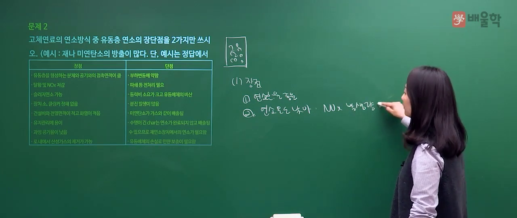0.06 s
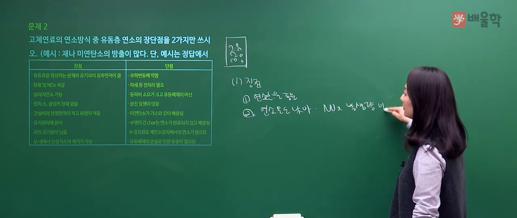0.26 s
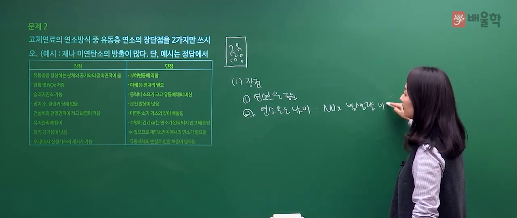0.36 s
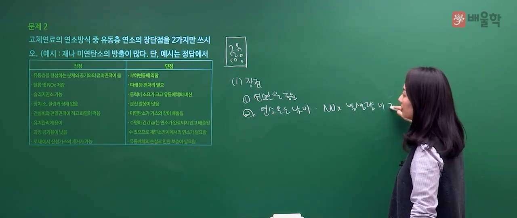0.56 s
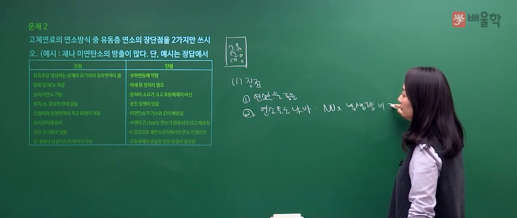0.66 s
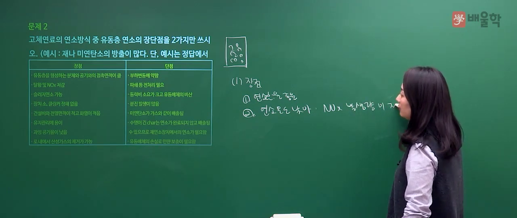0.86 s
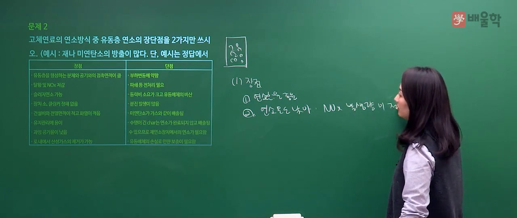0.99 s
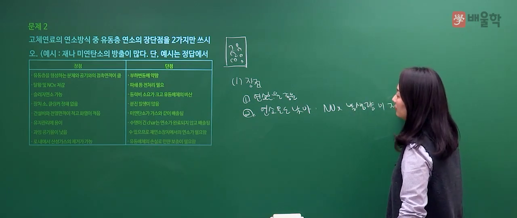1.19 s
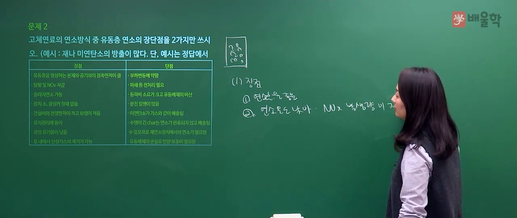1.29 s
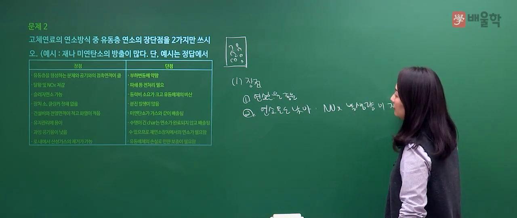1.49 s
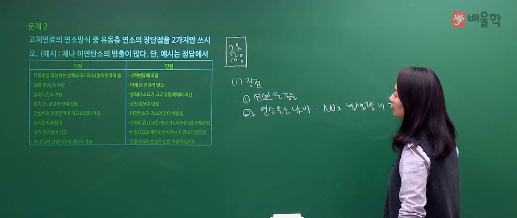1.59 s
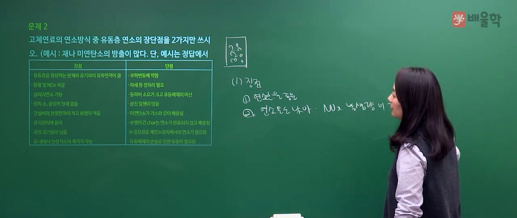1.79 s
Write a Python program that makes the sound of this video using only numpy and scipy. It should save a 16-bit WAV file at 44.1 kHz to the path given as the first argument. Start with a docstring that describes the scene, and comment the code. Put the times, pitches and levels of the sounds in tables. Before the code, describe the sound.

A stick of chalk taps a big wall board five times, the first two strongest, each followed by a slight dry rub; the board resonates briefly in a quiet room, picked up by one microphone with low room noise.

```python
"""Chalk on a wall board

Chalk writes on a large wall board in a quiet classroom. Dry knocks are a short push filtered by the
board's response, with a low thump and a crack at the tip; echoes, bending waves returning from
the frame, panel modes and room reverberation prolong them. The sliding chalk is random grains
filtered into a faint hiss, a rub and a panel hum, with tiny clicks where the tip catches.
Shaped noise forms the low room background."""
import sys
import numpy as np
from scipy import signal
from scipy.fft import rfft, irfft
from scipy.io import wavfile

SR = 44100
rng = np.random.default_rng(int(sys.argv[2]) if len(sys.argv) > 2 else 0)


def materialize(psi):
    """Save the field psi as 16-bit PCM at rate SR to the path in sys.argv[1].

    A 1-D psi becomes a single channel; in a 2-D psi each row is a channel.
    """
    bounded = np.clip(np.atleast_2d(psi).T, -1, 1)
    quanta = np.round(bounded * 32767).astype(np.int16)
    wavfile.write(sys.argv[1], SR, quanta)


N = 81585  # output length in samples
SIZE = 2 ** 17  # transform length in samples
HZ = np.maximum(np.arange(SIZE // 2 + 1) * SR / SIZE, 1)
AGE = np.arange(SIZE) / SR  # seconds

# Landings of the chalk. Each row: time in seconds, push level in dB, contact corner in Hz,
# tip crack in dB re CRACK_DB, thump in dB re THUMP_DB, stick ring in Hz, stick ring level in dB.
TAPS = [(0.2199, -0.5, 1760, 5, -0.5, 3900, -60), (0.4604, -1.5, 1186, -1.5, 2.5, 3220, -44.5),
        (0.7624, -6, 2930, 1.5, -3, 3840, -64), (1.2945, -5, 950, -28, -4.5, 3740, -52),
        (1.57, -5, 2580, -4.5, -2.5, 5300, -38.5)]
CONTACT_TOP = 2.17  # the push falls off faster above this multiple of the contact corner
STICK_T60_S = .009

# Response of the board at the point of contact. Each row: frequency in Hz, gain in dB re BOARD_DB.
BOARD = [(40, -20), (200, 2), (320, 10), (620, 13), (800, 10.5), (920, 0.5), (1100, 10), (1450, 8.5),
         (1850, 8.5), (2300, 3.5), (3050, 0), (3350, -12.5), (3900, 0.5), (5200, -2.5), (6300, -6.5),
         (16000, -54)]
BOARD_DB = 0.5

# Early reflections off nearby surfaces. Each row: delay in ms, signed share of the echo level.
ECHOES = [(3.98, -.11), (4.46, -.24), (6.14, .15)]
ECHO_CORNER_HZ, ECHO_LEVEL_DB = 2800, 1

# Bending waves back from the frame. Each row: travel time in ms at BEND_HZ, signed share.
RETURNS = [(8.18, -.1), (8.98, .3), (12.54, -.1), (14.54, -.15), (15.98, .14), (18.34, .1), (23.28, -.13),
           (26.88, -.13), (28.8, .12), (31.04, .13), (33.32, .13), (36.84, .15), (39.12, .19),
           (49.28, -.09), (57.68, .09)]
BEND_HZ, BEND_CUT_HZ, BEND_LOW_HZ, BEND_DB = 500, 1550, 313, -0.5

# Dense reflections: early scatter, the wash of many merged later returns, and the room.
SCATTER_DB, SCATTER_T60_S, SCATTER_DELAY_S = -7, 0.017, 0.003265
SCATTER_HZ, SCATTER_WIDTH_OCT = 1770, 0.31
WASH_DB, WASH_T60_S, WASH_DELAY_S, WASH_HZ, WASH_WIDTH_OCT = -20.5, 0.19, .02, 880, 0.71
ROOM_DB, ROOM_T60_S, ROOM_DELAY_S, ROOM_CUT_HZ = -17, 0.34, .012, 12000

# Modes of the panel. Each row: frequency in Hz, mean level in dB before the rise, T60 in seconds.
PANEL = [(201.7, -53, 0.53), (320, -62, 0.54), (360.3, -39, 0.19), (412, -49, 0.12), (456, -54.5, 0.3),
         (515, -54, 0.36), (667, -51, 0.27), (777, -52, 0.45), (768, -53, 0.1), (890, -52, .16),
         (1020, -76, 0.085), (1190, -70, 0.15)]
PANEL_RISE_S, PANEL_SPREAD_DB = 0.054, 3  # the balance changes with the spot that is struck

THUMP_HZ, THUMP_T60_S, THUMP_DB, THUMP_RISE_S = 60, 0.066, -33, 0.006

# Spectrum of the crumbling tip. Each row: frequency in Hz, relative level in dB.
CRACK = [(2500, -19), (4200, -1.5), (6200, -6), (8000, -0.5), (9600, -7), (11000, 3), (13000, -11),
         (16000, -2.5)]
CRACK_DB, CRACK_T60_S = -38.5, 0.0079

# Slides of the chalk. Each row: start in seconds, length in seconds, hiss in dB, rubbing in dB,
# panel hum in dB.
STROKES = [(-.02, 0.08, -70, -59.5, -68), (0.21, 0.11, -66, -59.5, -62.5), (0.475, 0.1, -67, -63.5, -61),
           (0.559, 0.095, -72, -60.5, -58.5), (0.76, 0.072, -67.5, -67, -57.5),
           (0.866, 0.077, -67.5, -58, -69), (0.935, 0.12, -71, -60.5, -62),
           (1.042, 0.12, -67, -61.5, -64.5), (1.167, 0.028, -78, -59, -83), (1.276, 0.029, -82, -57, -70),
           (1.297, 0.16, -72, -62, -65.5), (1.571, 0.1, -66, -60, -79), (1.703, 0.23, -72, -65, -74)]
STROKE_ATTACK_S, STROKE_RELEASE_S = 0.032, 0.033
STROKE_HUM_HZ, STROKE_HUM_OCT = 323, .05
GRAINS_PER_S, GRAIN_SPREAD_DB = 5600, 2.5

# Spectrum of the hiss at the tip. Each row: frequency in Hz, relative level in dB.
HISS = [(2500, -31), (4000, 1), (6200, -14.5), (8000, 3), (9400, 7.5), (10500, -2), (12000, 7),
        (16000, -4.5)]
# Spectrum of the rub on the board's face. Each row: frequency in Hz, relative level in dB.
RUB = [(40, 12), (250, 6), (450, -17), (900, -3.5), (1400, -4.5), (2100, -4.5), (3000, -9.5), (6000, -13.5)]

# Light catches of the tip. Each row: time in seconds, level in dB before the decay.
TICKS = [(1.117, -54.5), (1.696, -61)]
TICK_HZ, TICK_WIDTH_OCT, TICK_T60_S = 3300, .2, .02

# Spectrum of the room noise. Each row: frequency in Hz, relative density in dB per Hz.
AIR = [(15, -41), (25, -4.5), (190, -9), (256, -9.5), (335, -7), (394, -6.5), (503, -6), (677, -13),
       (988, -14.5), (1070, -18), (1400, -13), (1650, -21), (2220, -21), (2840, -28), (3430, -27),
       (3720, -29.5), (16000, -30.5)]
AIR_DB = -59.5
# Narrow bands in the room noise. Each row: centre frequency in Hz, level in dB.
HUM = [(322, -78), (443, -75)]
HUM_WIDTH_OCT = 0.026

CUTOFF_HZ = 16000


def taps():
    """Impact excitation: each push drives one board and its modes; thump, crack and stick ring add."""
    board = from_db(BOARD_DB) * colour(BOARD) * paths()
    low_thump = thump()
    tip = colour(CRACK)
    spectrum = 0
    for s, db, contact_hz, crack_db, thump_db, stick_hz, stick_db in TAPS:
        push = from_db(db) * low_pass(contact_hz) * abs(low_pass(CONTACT_TOP * contact_hz))
        knock = push * (board + panel(PANEL_SPREAD_DB))
        knock = knock + from_db(THUMP_DB + thump_db) * low_thump
        crack = from_db(CRACK_DB + crack_db) * noise(tip) * dying(CRACK_T60_S)
        stick = from_db(stick_db) * np.sin(2 * np.pi * stick_hz * AGE) * dying(STICK_T60_S)
        spectrum = spectrum + delay(s) * (knock + rfft(crack + stick))
    return irfft(spectrum)[:N]


def thump():
    """Damped oscillation: a low cosine with a brief rise and exponential decay, as a spectrum."""
    envelope = dying(THUMP_T60_S) * (1 - np.exp(-AGE / THUMP_RISE_S))
    return rfft(-np.cos(2 * np.pi * THUMP_HZ * AGE) * envelope)


def panel(spread_db):
    """Modal superposition: decaying sines build up together, their balance varied by chance."""
    gains = from_db(spread_db * rng.standard_normal(len(PANEL)))
    ring = 0
    for k, (hz, db, t60) in enumerate(PANEL):
        sign = (-1) ** k  # neighbouring modes alternate in polarity
        ring = ring + sign * gains[k] * from_db(db) * np.sin(2 * np.pi * hz * AGE) * dying(t60)
    return rfft(ring * (1 - np.exp(-AGE / PANEL_RISE_S)))


def paths():
    """Multipath propagation: direct sound, echoes, bending waves and dense reflections add."""
    echoes = sum(share * delay(ms / 1000) for ms, share in ECHOES)
    echoes = from_db(ECHO_LEVEL_DB) * abs(low_pass(ECHO_CORNER_HZ)) * echoes
    scatter = from_db(SCATTER_DB) * diffuse(SCATTER_T60_S, SCATTER_DELAY_S)
    scatter = scatter * band(SCATTER_HZ, SCATTER_WIDTH_OCT)
    room = from_db(ROOM_DB) * diffuse(ROOM_T60_S, ROOM_DELAY_S) * low_pass(ROOM_CUT_HZ)
    wash = from_db(WASH_DB) * diffuse(WASH_T60_S, WASH_DELAY_S) * band(WASH_HZ, WASH_WIDTH_OCT)
    return 1 + echoes + bending_returns() + scatter + wash + room


def bending_returns():
    """Dispersion: bending-wave speed grows as the root of frequency, so the highs return first."""
    # The phase delay is twice the group delay, which is the travel time.
    waves = sum(share * delay(2 * ms / 1000 * np.sqrt(BEND_HZ / HZ)) for ms, share in RETURNS)
    without_lows = 1 - abs(low_pass(BEND_LOW_HZ)) ** 2
    return from_db(BEND_DB) * waves * abs(low_pass(BEND_CUT_HZ)) * without_lows


def strokes():
    """Friction excitation: sliding chalk hisses at the tip, rubs the face and makes the panel hum."""
    t = AGE[:N]
    hiss, rub = grit(colour(HISS)), grit(colour(RUB))
    hum = grit(band(STROKE_HUM_HZ, STROKE_HUM_OCT))
    out = 0
    for start, length, hiss_db, rub_db, hum_db in STROKES:
        attack = (t - start) / STROKE_ATTACK_S
        release = (start + length - t) / STROKE_RELEASE_S
        pressure = np.clip(np.minimum(attack, release), 0, 1) ** .5
        slide = from_db(hiss_db) * hiss + from_db(rub_db) * rub + from_db(hum_db) * hum
        out = out + pressure * slide
    return out


def grit(response):
    """Shot noise: chalk grains break off at random and excite a response; scaled to rms 1."""
    spread = np.minimum(rng.exponential(1, SIZE), 5)
    sizes = from_db(GRAIN_SPREAD_DB * spread) * rng.choice([-1, 1], SIZE)
    breaks = rng.random(SIZE) < GRAINS_PER_S / SR
    return rms_one(irfft(rfft(sizes * breaks) * response))[:N]


def ticks():
    """Transient excitation: a light catch of the tip gives a narrow burst of decaying noise."""
    spectrum = 0
    for s, db in TICKS:
        click = noise(band(TICK_HZ, TICK_WIDTH_OCT)) * dying(TICK_T60_S)
        spectrum = spectrum + from_db(db) * delay(s) * rfft(click)
    return irfft(spectrum)[:N]


def room_noise():
    """Stationary noise: a steady broad air spectrum with two soft narrow bands."""
    air = from_db(AIR_DB) * noise(colour(AIR))
    hums = sum(from_db(db) * noise(band(hz, HUM_WIDTH_OCT)) for hz, db in HUM)
    return (air + hums)[:N]


def diffuse(t60, start_s):
    """Diffuse reverberation: dense reflections as exponentially decaying noise of energy 1."""
    tail = rng.standard_normal(SIZE) * dying(t60)
    return rfft(tail / np.sqrt(np.sum(tail ** 2))) * delay(start_s)


def noise(response):
    """Linear filtering: white noise takes the colour of a response; scaled to rms 1."""
    return rms_one(irfft(rfft(rng.standard_normal(SIZE)) * response))


def colour(points):
    """Minimum phase: folding the cepstrum gives a causal response through (Hz, dB) points."""
    hz, db = np.transpose(points)
    gain = from_db(np.interp(np.log(HZ), np.log(hz), db))
    cepstrum = irfft(np.log(gain))
    cepstrum[1:SIZE // 2] *= 2
    cepstrum[SIZE // 2 + 1:] = 0
    return np.exp(rfft(cepstrum))


def low_pass(hz):
    """Second-order roll-off: a maximally flat low-pass response."""
    s = 1j * HZ / hz
    return 1 / (1 + np.sqrt(2) * s + s * s)


def band(hz, octaves):
    """Band selection: a Gaussian response on a logarithmic frequency axis."""
    return np.exp(-.5 * (np.log2(HZ / hz) / octaves) ** 2)


def delay(s):
    """Pure delay: phase turns in proportion to frequency."""
    return np.exp(-2j * np.pi * HZ * s)


def dying(t60):
    """Exponential damping: amplitude falls 60 dB in t60 seconds."""
    return np.exp(-np.log(1000) * AGE / t60)


def from_db(db):
    """Logarithmic level: decibels to amplitude gain."""
    return 10 ** (np.asarray(db) / 20)


def rms_one(x):
    """Effective value: scale a signal to rms 1."""
    return x / np.sqrt(np.mean(x ** 2) + 1e-20)


def scene():
    """Superposition: knocks, strokes, ticks and room noise add in one channel."""
    return (taps() + strokes() + ticks() + room_noise())[None]


def record(dry):
    """Band limiting: a steep elliptic low-pass removes the top of the spectrum."""
    top_cut = signal.ellip(10, .1, 70, CUTOFF_HZ, fs=SR, output="sos")  # ripple, stopband in dB
    return signal.sosfilt(top_cut, dry)


dry = scene()
out = record(dry)
materialize(out)
```